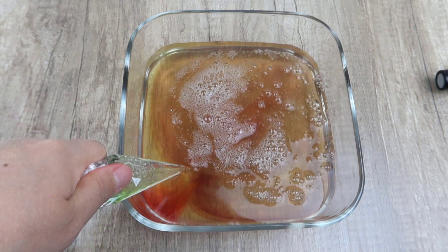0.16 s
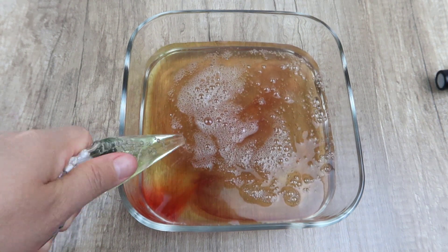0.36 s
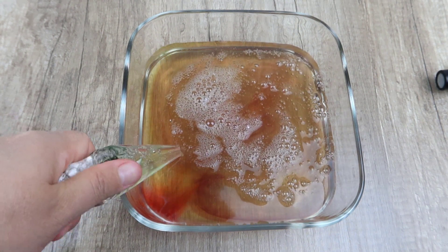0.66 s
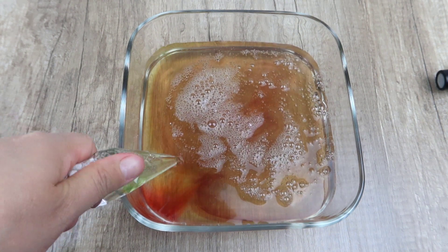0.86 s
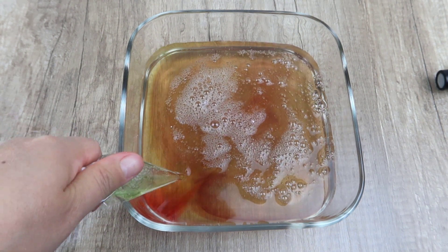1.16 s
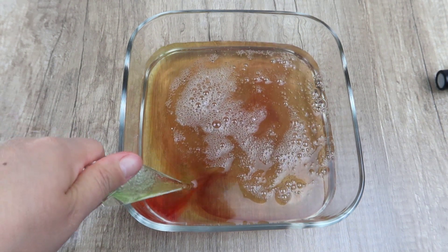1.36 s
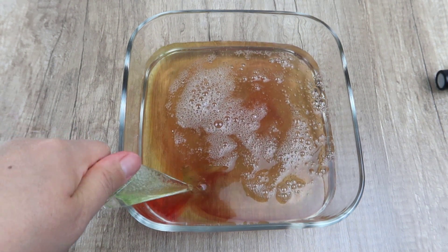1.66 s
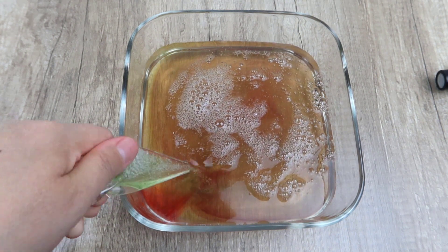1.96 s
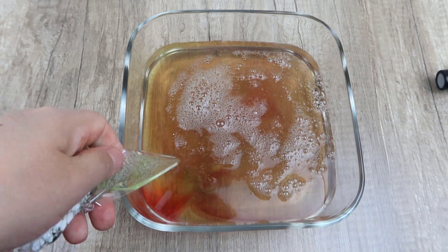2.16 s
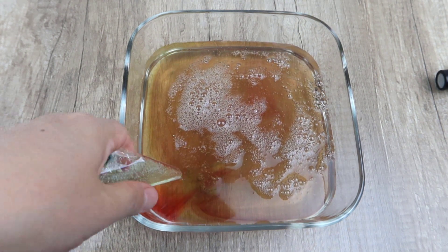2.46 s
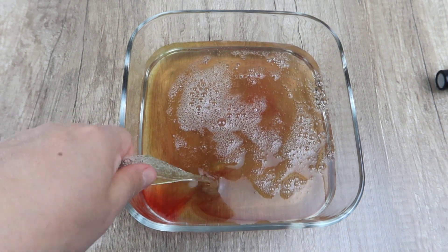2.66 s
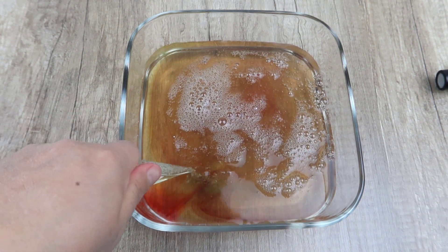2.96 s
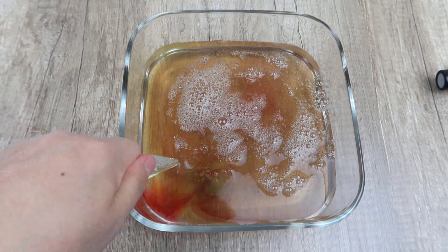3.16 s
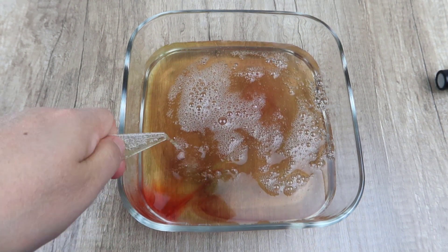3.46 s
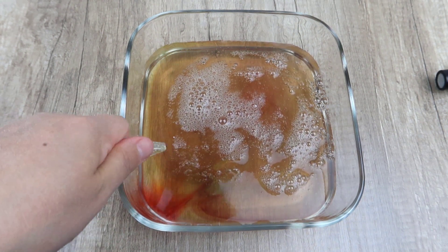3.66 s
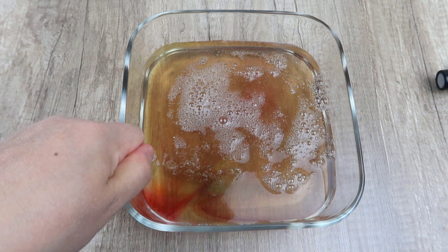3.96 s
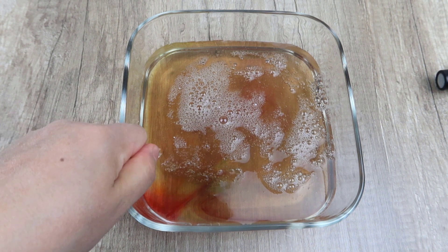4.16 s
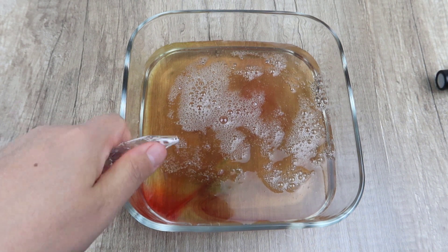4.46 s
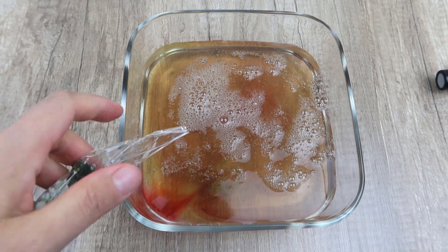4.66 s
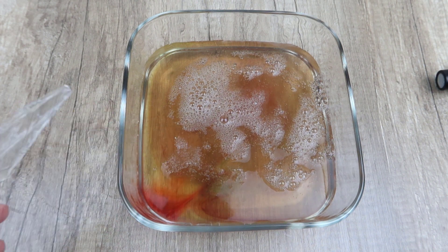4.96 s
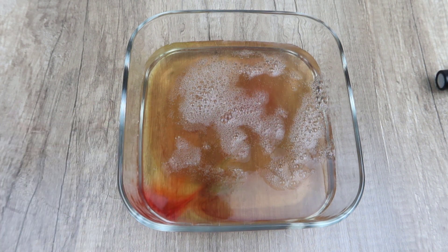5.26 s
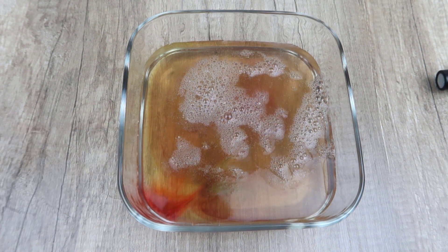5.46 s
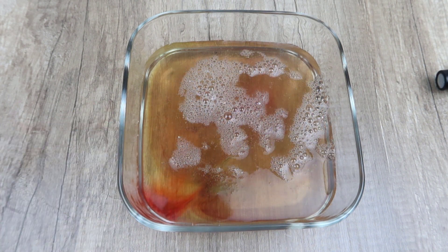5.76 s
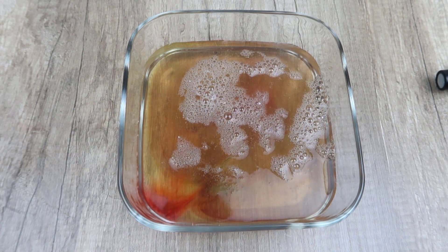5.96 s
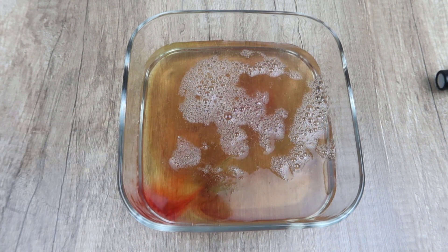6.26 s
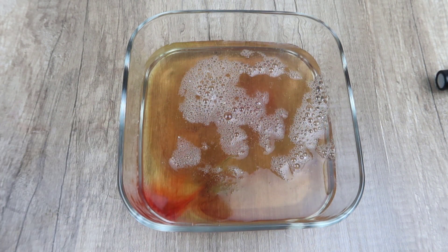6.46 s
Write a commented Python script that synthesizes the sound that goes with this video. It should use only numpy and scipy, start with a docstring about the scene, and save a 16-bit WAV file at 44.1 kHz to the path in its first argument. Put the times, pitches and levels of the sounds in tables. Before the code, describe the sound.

A hand works a crackly plastic piping bag over a glass dish, bursts of sharp pops and crinkle, then sudden near-silence and faint hiss.

```python
"""Squeezing a plastic piping bag

A hand squeezes out a thin plastic piping bag over a glass dish of liquid, close to the microphone.
Film snaps, ticks and crinkle are resonant pops with bright cracks; the grip sets how often and how loudly.
The dish is knocked once: decaying sines ring, filtered noise thuds and a low sine gloops.
Then the bag is drawn away, leaving a quiet room of shaped noise, a faint wavering hum and a thin whine."""
import sys
import numpy as np
from scipy import signal
from scipy.fft import rfft, irfft
from scipy.io import wavfile
from scipy.ndimage import uniform_filter1d

SR = 44100
rng = np.random.default_rng(int(sys.argv[2]) if len(sys.argv) > 2 else 0)


def dump_mix(stems):
    """Bounce the given channels to the path in sys.argv[1] as a 16-bit WAV at rate SR."""
    frames = np.atleast_2d(stems).T  # one column per channel
    limited = np.clip(frames, -1, 1)  # hard clip at full scale
    pcm = np.round(limited * 32767).astype(np.int16)
    wavfile.write(sys.argv[1], SR, pcm)


N = 291929  # length in samples

# loudest creases that buckle: start_s [s], level_db [relative dB], pitch_hz [Hz],
# crispness_db [dB, crack against resonance]
LOUD_SNAPS = [(0.0135, -15.5, 3920, -7), (0.0503, -11.5, 1330, -20), (0.2838, -9, 2110, 5),
              (0.3546, -4.5, 1546, -17), (0.388, -4, 1720, -11), (0.3971, -3.5, 1430, -6.5),
              (0.4334, -8, 1986, -22), (0.457, -10.5, 2370, -25), (0.5196, -14, 1600, 8),
              (0.5798, -11, 3200, -28), (0.5972, -18, 1500, -10), (0.6236, -4.5, 4250, -6.5),
              (0.6825, -7.5, 1920, -6), (0.7471, -9.5, 2840, -5.5), (0.7918, -10, 1660, -32),
              (0.928, -9.5, 5470, -14), (1.0157, -7, 1440, -11.5), (1.076, -16.5, 1360, -16),
              (1.2224, -18.5, 1400, -16), (1.5228, -20, 1580, -11), (1.5616, -20, 1380, -26),
              (1.7712, -8.5, 2460, 1), (1.9502, -11, 1440, 5), (1.991, -15, 1940, 0), (1.999, -8, 875, -24),
              (2.0129, -1, 1480, -21), (2.0241, 4.5, 1900, -27), (2.028, -4, 1940, -26),
              (2.0725, -12, 1670, 20), (2.123, -8.5, 2400, -2), (2.1716, -11.5, 1640, -11),
              (2.2387, -16, 1670, 1), (2.4365, -12, 2200, -23), (2.4688, -12, 3100, -30),
              (2.579, -13, 2730, -26), (2.6109, -2.5, 3070, -14), (2.6447, -7.5, 2554, -28),
              (2.6529, -0.5, 1500, 5), (2.737, -10.5, 2870, -10), (2.8122, -0.5, 2830, -6),
              (2.845, -8, 1970, -9), (2.8708, -15, 1730, 3), (2.9817, -12.5, 1790, -0.5),
              (3.1126, -1.5, 2540, -15), (3.1537, -14, 2430, -28), (3.1916, -9, 2230, -10),
              (3.205, -15.5, 1940, 6), (3.429, -11, 9900, -10), (3.4638, -14.5, 3200, 0),
              (3.5949, -12, 1100, 6), (3.691, -10.5, 3260, -14), (3.8174, -11.5, 4320, -10),
              (3.854, -12.5, 1670, -12), (4.0388, -13, 1600, 8), (4.062, -8, 3580, -16),
              (4.323, -5, 1900, -16.5), (4.4018, -15, 1610, 6), (4.499, -8.5, 1030, -0.5),
              (4.515, -7, 3680, -12), (4.5278, -6.5, 3120, -26), (4.542, -9, 2290, -23),
              (4.5884, -11.5, 2480, -30), (4.609, -6, 2000, -30), (4.628, -5.5, 2750, -24),
              (4.697, -10, 1526, -33), (4.7359, -9, 1514, -31), (4.7973, -3, 1790, -25),
              (4.886, -7.5, 1380, -15.5), (4.9444, -10, 1500, -11.5), (5.0588, -5.5, 2350, -5),
              (5.087, -3.5, 1480, -12), (5.0953, 0, 3380, -11), (5.104, -1.5, 3270, -7),
              (5.1179, -4.5, 3300, -15), (5.1319, -4, 3305, -15)]
# colour shared by every sound of the film: frequency_hz [Hz], gain_db [dB]
FILM_COLOUR = [(100, -9), (350, -4.5), (750, 2), (1150, -1.5), (1600, 2), (2200, -2), (3400, 1.5),
               (4200, 3.5), (5200, -4.5), (6800, -7), (10000, -12), (15000, -20.5)]
# modes of the filled glass dish: pitch_hz [Hz], level_db [relative dB], t60_s [s]
DISH_MODES = [(378, -18, 0.67), (606, -2, 0.088), (820, -1, 0.69), (1133, 1.5, 0.14), (1252, -1, 0.23),
              (1690, -22, 0.29), (2067, 0.5, 0.28), (2693, -4, 0.13)]
KNOCK_S = 3.3962
# hum of steady level: pitch_hz [Hz], level_db [dB rms]
HUM_TONES = [(198, -62), (99, -72), (118.6, -70.5), (300.6, -75), (392, -75)]
# level of a low drone that dies away: time_s [s], level_db [dB rms]
DRONE_LEVEL = [(0, -63), (.9, -60.5), (1.7, -62), (2.0, -72), (3.0, -84), (6.6, -88)]
# thin electrical whine: pitch_hz [Hz], level_db [dB rms]
WHINE_TONES = [(5857, -83), (8786, -101), (14041, -100), (14814, -82), (14873, -79)]
# spectrum of still air and microphone hiss: frequency_hz [Hz], density_db [relative dB per Hz]
AIR_SPECTRUM = [(12, -41), (20, -14), (53, -6), (172, -7), (204, -7), (228, -8), (293, -8.5), (367, -10.5),
                (849, -16.5), (1260, -19.5), (9670, -27), (14300, -26), (16000, -31)]
AIR_RMS_DB = -54
# reverberation of the room: frequency_hz [Hz], t60_s [s]
ROOM_DECAY = [(300, 0.21), (1500, 0.15), (4000, 0.26), (8000, 0.3), (14000, 0.11)]
EDGE_HZ = 15900  # top of the recorder's band
# squeezes of the hand: tightest_s [s], level_db [relative dB of crinkle], tighten_s [s], relax_s [s],
# tautness_db [spectral tilt of the film, dB per octave]
HAND_SQUEEZES = [(0.375, -34, .06, 0.18, -1), (0.60, -50, .2, .1, -5), (0.69, -46, .1, .22, -3),
                 (2.023, -35.5, .18, .06, 2), (2.16, -49, .14, 0.24, -3), (2.50, -51, .35, .2, 1),
                 (2.63, -43.5, 0.19, .28, 5), (2.86, -40, .22, .13, 6), (3.13, -47.5, 0.29, .27, 5),
                 (3.32, -41, 0.15, .31, 7.5), (3.67, -54, 0.22, .14, 10), (4.33, -43, .012, 0.13, -14),
                 (4.512, -40, 0.16, 0.17, 0), (4.66, -41.5, .17, .19, -5.5), (5.11, -33, .11, .1, -0.5),
                 (5.24, -48.5, .04, 0.022, -5)]
GRIP_RANGE_DB = 22  # rise over each tighten time, fall over each relax time
HELD_DB, HELD_TAUT_DB = -66, -10.5  # bag merely held: relative crinkle level, tilt per octave
GONE_S, LEAVE_DB_PER_S = 5.22, 500  # the bag is drawn away


def amp(db):
    """Decibels to gain."""
    return 10 ** (np.asarray(db) / 20)


def unit(x):
    """Scales to energy 1."""
    return x / np.sqrt(np.sum(x ** 2) + 1e-20)


def read(points, hz):
    """Reads a table on a log-frequency axis."""
    f, value = np.transpose(points)
    return np.interp(np.log(hz + 1), np.log(f + 1), value)


def curve(rows):
    """Reads a table of (s, value) at every sample."""
    return np.interp(np.arange(N) / SR, *np.transpose(rows))


def add(mix, s, sound):
    """Mixes a sound in at time s."""
    part = mix[max(round(s * SR), 0):][:len(sound)]
    part += sound[:len(part)]


def background(drone_hz=114, waver_hz=0.83):
    """Still air is shaped noise; hum, drone and whine are sines whose pitch wavers slightly."""
    air_gain = amp(read(AIR_SPECTRUM, np.fft.rfftfreq(N, 1 / SR)))
    air = irfft(rfft(rng.standard_normal(N)) * air_gain, N)
    out = amp(AIR_RMS_DB) * unit(air) * np.sqrt(N)
    for hz, db in HUM_TONES + WHINE_TONES + [(drone_hz, curve(DRONE_LEVEL))]:
        drift = np.interp(np.arange(N), np.linspace(0, N, 40), rng.standard_normal(40))
        phase = 2 * np.pi * np.cumsum(hz + waver_hz * drift) / SR
        out += np.sqrt(2) * amp(db) * np.sin(phase)
    return out


def grip():
    """Each squeeze swells and sinks in straight dB lines; the strongest sets level and tautness."""
    t = np.arange(N) / SR
    levels = [HELD_DB - LEAVE_DB_PER_S * np.clip(t - GONE_S, 0, .1)]
    for s, db, tighten_s, relax_s, _ in HAND_SQUEEZES:
        levels.append(db - GRIP_RANGE_DB * np.maximum((s - t) / tighten_s, (t - s) / relax_s))
    tautness = np.array([HELD_TAUT_DB] + [row[-1] for row in HAND_SQUEEZES])
    strongest = np.argmax(levels, axis=0)
    return np.max(levels, axis=0), uniform_filter1d(tautness[strongest], size=1024)


def causal(gain):
    """The sharpest click that has this spectrum (minimum phase)."""
    log_gain = np.log(np.maximum(np.r_[gain, gain[-2:0:-1]], 1e-5))
    return np.fft.ifft(np.exp(np.conj(signal.hilbert(log_gain)))).real


def patch(hz, crisp_db, q=2.46, crack_hz=3000, top=2.1, size=1024):
    """One patch of film pops: a damped resonance plus the bright crack of its crease."""
    f = np.fft.rfftfreq(size, 1 / SR) + 1
    ring = 1 / (1 + q ** 2 * (f / hz - hz / f) ** 2)
    ring /= 1 + (f / (top * hz)) ** 4  # the resonance dulls well above its pitch
    crack = amp(crisp_db) ** 2 / (1 + (crack_hz / f) ** 4)
    return causal(np.sqrt(ring + crack) * amp(read(FILM_COLOUR, f)))


def folds(x, split_hz=4900, scatter_s=0.0044, size=700):
    """The hand shades the treble, which escapes only by scattering among folds, anew each call."""
    x = np.pad(x, (0, size))
    low = signal.sosfilt(signal.butter(4, split_hz, fs=SR, output="sos"), x)
    high = signal.sosfilt(signal.butter(4, split_hz, "high", fs=SR, output="sos"), x)
    scatter = unit(rng.standard_normal(size) * np.exp(-np.arange(size) / SR / scatter_s))
    return low + signal.fftconvolve(high, scatter)[:len(x)]


def crinkle(effort_db, taut_db, level_db=-1, per_s=450, spread_db=4.5, low_hz=1350, high_hz=4400,
            crisp_db=-15, crisp_spread_db=7, q=1.65, crowding=.6, count=20):
    """Countless small creases give way, more often when the bag is worked hard, higher when taut."""
    effort, out = amp(effort_db), np.zeros(N)
    rate = per_s * (effort / effort.mean()) ** crowding
    pitches = np.geomspace(low_hz, high_hz, count)
    octaves = np.log2(pitches / np.median(pitches))
    shares = amp(octaves[:, None] * taut_db)
    shares /= np.sqrt(np.mean(shares ** 2, axis=0))
    # some creases are dull and some crisp
    crispness = crisp_db + crisp_spread_db * rng.permutation(np.linspace(-1, 1, count))
    for hz, share, crisp in zip(pitches, shares, crispness):
        sizes = amp(spread_db * np.minimum(rng.exponential(1, N), 4))
        signs = rng.choice([-1, 1], N)
        gives_way = rng.random(N) < rate / count / SR
        clicks = unit(sizes) * np.sqrt(N) * signs * gives_way
        # dividing by the root of the rate lets effort alone set the loudness
        drive = clicks * share * effort * np.sqrt(SR / rate)
        out += signal.oaconvolve(drive, folds(unit(patch(hz, crisp, q))))[:N]
    return amp(level_db) * out


def ticks(effort_db, level_db=-21, per_s=40, spread_db=3, low_hz=5500, high_hz=11000,
          follow=0.6, slack_db=-62, crisp_db=-26):
    """Now and then a tiny stiff crease gives a high tick, even under light pressure."""
    out = np.zeros(N)
    for when, pitch, chance in rng.random((round(per_s * N / SR), 3)):
        at = int(when * N)
        if effort_db[at] > slack_db:  # a slack bag gives no ticks
            size_db = -spread_db * np.log(chance + .04)
            db = level_db + size_db + follow * (effort_db[at] - effort_db.max())
            hz = low_hz * (high_hz / low_hz) ** pitch
            add(out, at / SR, amp(db) * folds(unit(patch(hz, crisp_db))))
    return out


def buckle(hz, crisp_db, strain_db, run_ms=1.65, run_follow=.25, slip_db=-3, slips_per_s=9000, size=600):
    """One pop, then tiny slips while the crease runs on; it runs longer in a tight grip."""
    slips = rng.standard_normal(size) * (rng.random(size) < slips_per_s / SR)
    age_ms = np.arange(size) / SR * 10 ** 3
    age = age_ms / (run_ms * amp(run_follow * strain_db))
    drive = amp(slip_db) * slips * (1 + age) * np.exp(-age)
    drive[0] = 1  # the pop itself
    return folds(unit(np.convolve(drive, patch(hz, crisp_db))))


def small_snaps(effort_db, level_db=-14, follow=0.36, spread_db=0.5, tries_per_s=110, crowding=.75,
                low_hz=1500, high_hz=3700, crisp_db=-16, crisp_spread_db=16):
    """Lesser creases buckle by chance, more often and louder as the grip tightens."""
    out, strain_db = np.zeros(N), effort_db - effort_db.max()
    for when, chance, strength, pitch, edge in rng.random((round(tries_per_s * N / SR), 5)):
        strain = strain_db[int(when * N)]
        if chance < amp(crowding * strain):
            db = level_db + follow * strain + spread_db * (2 * strength - 1)
            hz = low_hz * (high_hz / low_hz) ** pitch
            crisp = crisp_db + crisp_spread_db * (2 * edge - 1)
            add(out, when * N / SR, amp(db) * buckle(hz, crisp, strain))
    return out


def snaps(effort_db, lead_db=-24, lead_s=.006, body_db=-13, body_hz=540, body_follow=1.2,
          body_crisp_db=-30, body_q=1.2):
    """Loud buckles: a faint slip runs ahead, and the whole bag flexes with a low pop, more in a tight grip."""
    out, strain_db = np.zeros(N), effort_db - effort_db.max()
    for s, db, hz, crisp_db in LOUD_SNAPS:
        strain = strain_db[round(s * SR)]
        slip_s = s - lead_s * (.5 + rng.random())
        add(out, slip_s, amp(db + lead_db) * buckle(hz, crisp_db, strain))
        add(out, s, amp(db) * buckle(hz, crisp_db, strain))
        body = unit(patch(body_hz, body_crisp_db, body_q))
        add(out, s, amp(db + body_db + body_follow * strain) * body)
    return out


def echoes(near_db=-11, near_s=0.0081, tail_db=-15.5, taps_per_s=4000):
    """Quick echoes from hand, dish and table, then the short tail of a small room."""
    t = np.arange(SR // 2) / SR
    signs = rng.choice([-1, 1], (2, len(t)))
    near, far = signs * (rng.random((2, len(t))) < taps_per_s / SR)
    near = unit(near * np.exp(-t / near_s) * (t > .0015))
    # each frequency of the tail dies away at its own pace
    hz, when, z = signal.stft(far * (t > .008), SR, nperseg=256)
    decay = amp(-60 * when / read(ROOM_DECAY, hz)[:, None])
    tail = signal.istft(z * decay, SR, nperseg=256)[1][:len(t)]
    return amp(near_db) * near + amp(tail_db) * unit(tail)


def room(x, count=5, changes_per_s=8):
    """The hand keeps moving, so one pattern of echoes fades into the next, cycling through a few."""
    place, out = np.arange(N) / SR * changes_per_s, x.copy()
    for k in range(count):
        away = abs((place - k) % count - count / 2)
        fade = np.cos(np.pi / 2 * np.minimum(away, 1))
        out += signal.oaconvolve(x * fade, echoes())[:N]
    return out


def dish(ring_db=-28, thud_db=-7, thud_hz=900, thud_t60=0.12, gloop_db=-32, gloop_hz=427,
         gloop_s=3.441, gloop_width=0.024):
    """A soft knock rings the glass and thuds into the table; a short low gloop swells just after."""
    t, out = np.arange(SR) / SR, np.zeros(N)
    ring = np.zeros(SR)
    for hz, db, t60 in DISH_MODES:
        ring += amp(db - 60 * t / t60) * np.sin(2 * np.pi * hz * t) * rng.choice([-1, 1])
    thud_band = signal.butter(2, [90, thud_hz], "band", fs=SR, output="sos")
    thud = signal.sosfilt(thud_band, rng.standard_normal(SR))
    thud *= amp(-60 * t / thud_t60)
    swell = np.exp(-((t + KNOCK_S - gloop_s) / gloop_width) ** 2)
    gloop = np.sin(2 * np.pi * gloop_hz * t) * swell
    add(out, KNOCK_S, amp(ring_db) * ring + amp(thud_db) * unit(thud) + amp(gloop_db) * gloop)
    return out


def scene(hiss_db=-70):
    """Bag, dish and room sit in the centre; only a trace of hiss differs between the ears."""
    effort_db, taut_db = grip()
    bag = snaps(effort_db) + crinkle(effort_db, taut_db) + ticks(effort_db) + small_snaps(effort_db)
    middle = room(bag) + dish() + background()
    hiss_filter = signal.butter(2, 220, "high", fs=SR, output="sos")
    side = amp(hiss_db) * signal.sosfilt(hiss_filter, rng.standard_normal(N))
    return np.array([middle + side, middle - side])


def record(dry):
    """The recorder's band limit: a steep low-pass."""
    low_pass = signal.firwin(511, EDGE_HZ, window=("kaiser", 9), fs=SR)
    return signal.oaconvolve(dry, low_pass[None], "same")


dry = scene()
out = record(dry)
dump_mix(out)
```